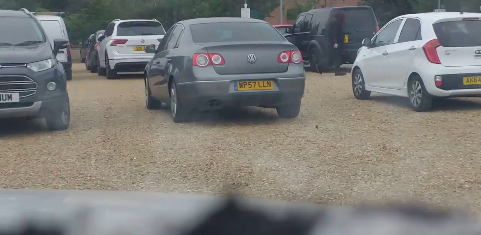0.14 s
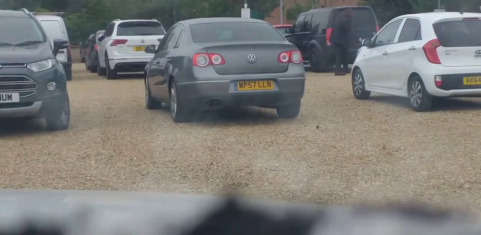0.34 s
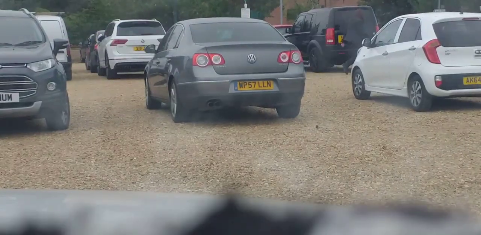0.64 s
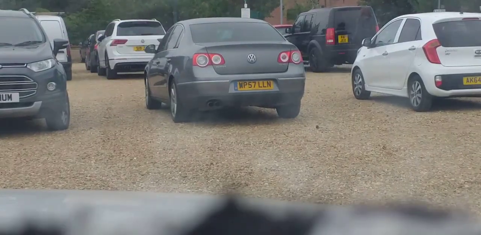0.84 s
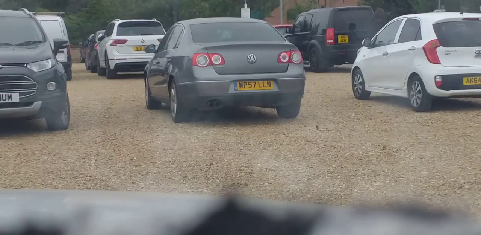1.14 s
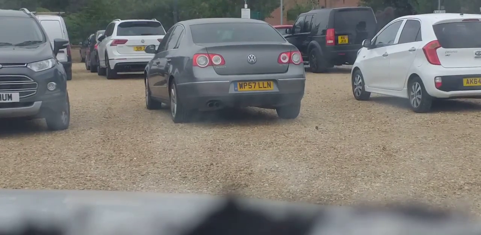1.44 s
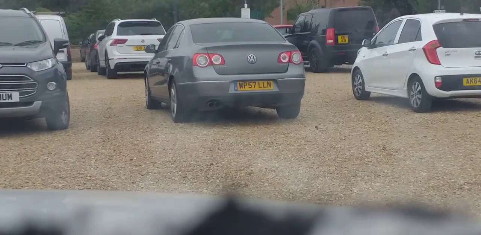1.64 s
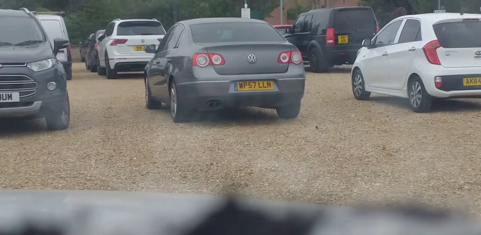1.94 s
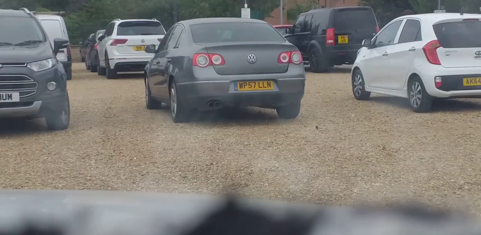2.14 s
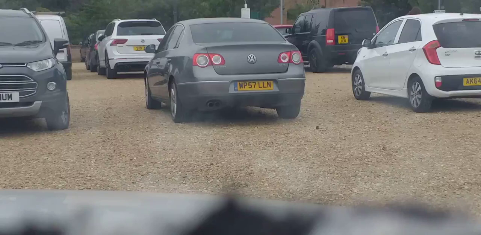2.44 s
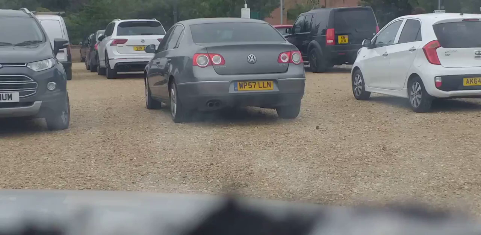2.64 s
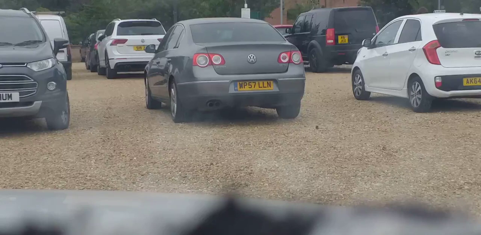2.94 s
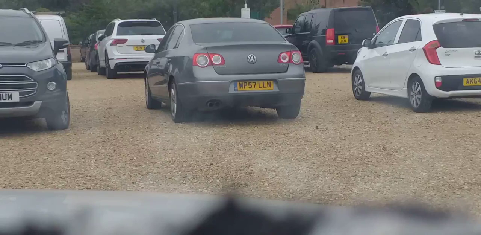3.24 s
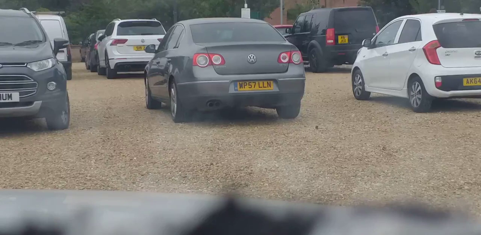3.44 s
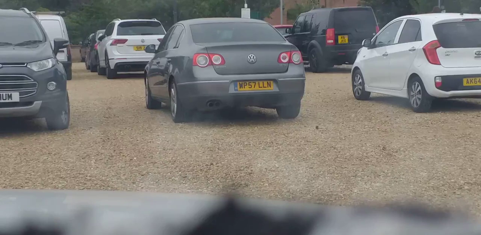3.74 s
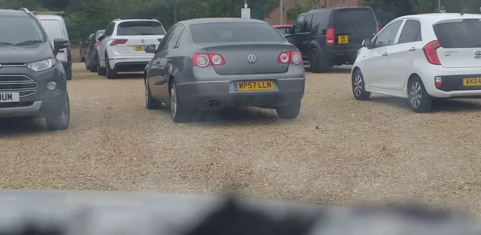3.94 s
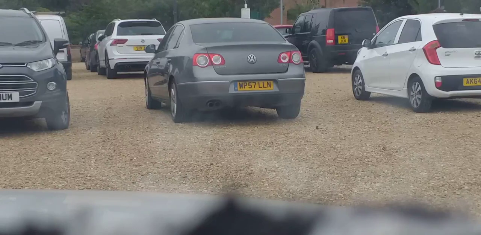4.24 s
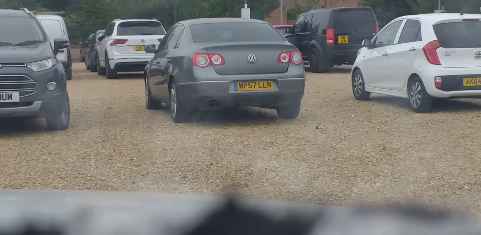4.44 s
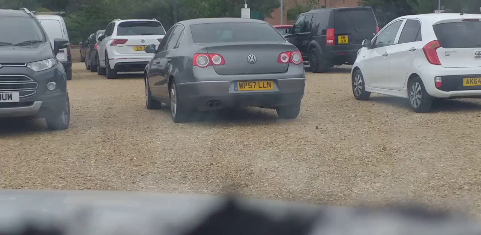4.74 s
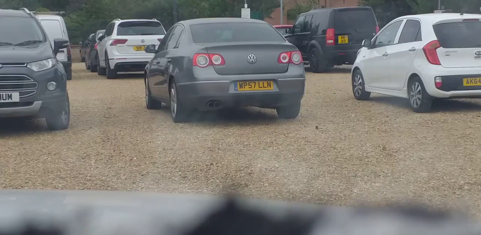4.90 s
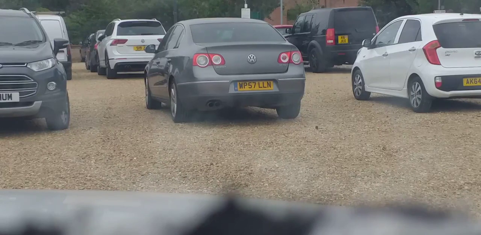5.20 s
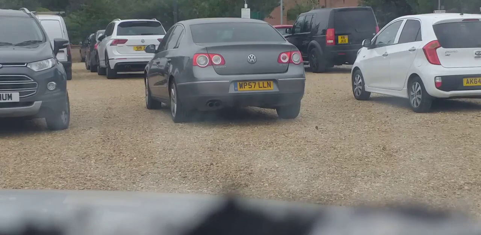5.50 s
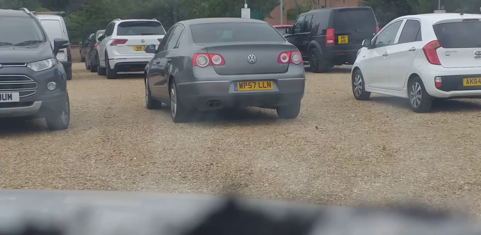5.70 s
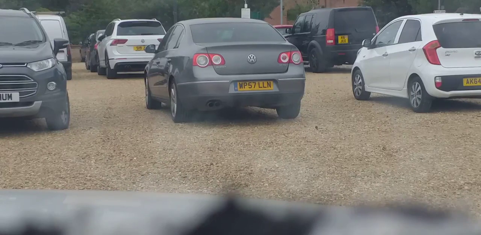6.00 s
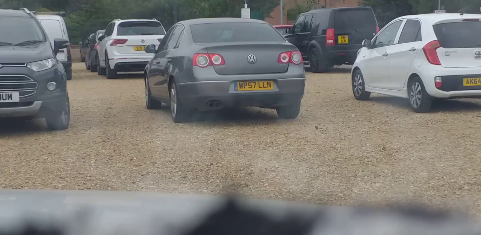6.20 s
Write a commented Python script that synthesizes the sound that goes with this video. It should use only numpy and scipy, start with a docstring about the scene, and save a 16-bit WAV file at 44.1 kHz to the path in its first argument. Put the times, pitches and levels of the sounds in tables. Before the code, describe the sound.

The sound is close, inside the small cabin of a parked car. A hollow knock at about 0.3 seconds starts a series of soft cloth rustles as someone slides over the seat, the cushion rumbling underneath. Dull bumps and sharp little clicks come around 0.8 and 1.3 seconds, with tiny upholstery squeaks near 0.4, 1 and 3 seconds. The trim is scuffed at 2 seconds, and a seat belt hisses faintly from 2.3 to 2.7. More bumps and clicks follow at 2.7 and 3.1 seconds. At 3.8 seconds the door slams, much louder than everything else: a sharp latch crack, a low boom and a shudder that fades within about half a second. Short scuffs and hollow knocks follow near 4.4, 5 and 5.8 seconds, the last the strongest. A faint outdoor rumble lies beneath, swelling slightly around 6 seconds.

```python
"""Cloth rustles inside a parked car as someone slides over the seat, bumping, clicking and scuffing
against the trim. The cushion rumbles, upholstery squeaks and a belt hisses back through its guide.
The door slams: the latch cracks, the panel booms and the body shudders.
In the quiet, closed cabin a few short scuffs follow over a faint outdoor rumble."""
import sys
import numpy as np
from scipy import signal
from scipy.fft import rfft, irfft
from scipy.io import wavfile

SR = 44100
rng = np.random.default_rng(int(sys.argv[2]) if len(sys.argv) > 2 else 0)


def materialize(psi):
    """Save the field psi as 16-bit PCM at rate SR to the path in sys.argv[1].

    A 1-D psi becomes a single channel; in a 2-D psi each row is a channel.
    """
    bounded = np.clip(np.atleast_2d(psi).T, -1, 1)
    quanta = np.round(bounded * 32767).astype(np.int16)
    wavfile.write(sys.argv[1], SR, quanta)


N = 280476
TIME_S = np.arange(N) / SR


def amp(db):
    """Decibels to gain."""
    return 10 ** (np.asarray(db) / 20)


def unit(x):
    """Scales to rms 1."""
    return x / np.sqrt(np.mean(x ** 2) + 1e-20)


def lookup(points, hz):
    """Interpolates a table on a log-frequency axis."""
    points_hz, values = np.transpose(points)
    return np.interp(np.log(hz + 1), np.log(points_hz + 1), values)


def add(mix, start_s, sound):
    """Mixes a sound in at start_s."""
    part = mix[max(round(start_s * SR), 0):][:len(sound)]
    part += sound[:len(part)]


def tint(x, colour):
    """Filters x to rms 1. Each colour row: frequency in Hz, gain in dB."""
    hz = np.fft.rfftfreq(len(x), 1 / SR)
    return unit(irfft(rfft(x) * amp(lookup(colour, hz)), len(x)))


def noise(size, colour):
    """Coloured noise, rms 1."""
    return tint(rng.standard_normal(size), colour)


def wander(rate_hz):
    """Smooth random drift, rms 1."""
    hz = np.fft.rfftfreq(N, 1 / SR)
    return unit(irfft(rfft(rng.standard_normal(N)) * np.exp(-(hz / rate_hz) ** 2), N))


def slips(size, per_s, spread_db):
    """Tiny friction impulses of uneven strength at random moments."""
    impulses = rng.standard_normal(size) * (rng.random(size) < per_s / SR)
    return impulses * amp(spread_db * np.minimum(rng.exponential(1, size), 3))


def swell(t, rise_s, t60_s):
    """Linear rise, exponential decay."""
    return np.minimum(t / rise_s, 1) * amp(-60 * np.maximum(t - rise_s, 0) / t60_s)


def held_db(start_s, end_s, rise_db_per_s, fall_db_per_s):
    """Attack, hold at 0 dB, release."""
    return -rise_db_per_s * np.maximum(start_s - TIME_S, 0) - fall_db_per_s * np.maximum(TIME_S - end_s, 0)


def shaped(x, envelope):
    """Envelopes x, scaled to the energy of the envelope."""
    return unit(x * envelope) * np.sqrt(np.mean(envelope ** 2))


def ring(modes, rise_s, detune=0.):
    """Decaying modes, struck once."""
    t = TIME_S[:SR * 3 // 4]
    out = np.zeros(len(t))
    for hz, db, t60_s in modes:
        tuned_hz = hz * (1 + detune * rng.standard_normal())
        out += amp(db) * swell(t, rise_s, t60_s) * np.sin(2 * np.pi * tuned_hz * t)
    return out


def reflections(ripple_db):
    """Colour of nearby glass and trim: narrow peaks and dips."""
    hz = np.arange(300, SR / 2, 60)
    return np.column_stack([hz, ripple_db * rng.standard_normal(len(hz))])


# Band crossovers. Each row: start in Hz, end in Hz.
CROSSOVERS_HZ = [(500, 800), (2800, 3800), (8000, 9500)]


def bands(x):
    """Splits x into thud, rub, hiss and fizz, each at rms 1."""
    hz = np.fft.rfftfreq(len(x), 1 / SR)
    above = [1] + [np.interp(hz, edge, [0, 1]) for edge in CROSSOVERS_HZ] + [0]
    spectrum = rfft(x)
    return [unit(irfft(spectrum * (low - high), len(x))) for low, high in zip(above, above[1:])]


# Outdoor rumble through the shell. Each row: frequency in Hz, gain in dB.
RUMBLE_COLOUR = [(15, -61.5), (25, -31.5), (46, -14.5), (69, -5.5), (84, -9.5), (99, -15), (183, -19.5),
                 (215, -19.5), (331, -33.5), (1240, -46), (2770, -46.5), (3090, -54), (3530, -41.5),
                 (5730, -50), (15500, -49)]


def outdoors(rumble_db=-60.5, drone_hz=69, drone_db=-57, peak_s=6.15, slope_db_per_s=30):
    """Distant rumble, mostly bass inside the car; a low drone swells and ebbs."""
    pitch_hz = drone_hz + .68 * wander(rate_hz=3.6)
    drone = np.sqrt(2) * np.sin(2 * np.pi * np.cumsum(pitch_hz) / SR)
    envelope = amp(drone_db - slope_db_per_s * abs(TIME_S - peak_s))
    return amp(rumble_db) * noise(N, RUMBLE_COLOUR) + drone * envelope


# Webbing spectrum. Each row: frequency in Hz, gain in dB.
BELT_COLOUR = [(3500, -24), (4280, -4), (4550, -2), (4880, -9), (6200, -5), (8500, -35), (9700, -23.5),
               (10800, -23), (13000, -15.5), (15500, -12)]
# Belt runs. Each row: start in seconds, end in seconds, level in dB.
BELT_RUNS = [(2.28, 2.68, -56.5), (3.44, 3.52, -67.5)]


def belt(ramp_db_per_s=80):
    """Webbing gathers and loses speed, hissing through its guide with a thin whistle."""
    envelope = sum(amp(db + held_db(start_s, end_s, ramp_db_per_s, ramp_db_per_s))
                   for start_s, end_s, db in BELT_RUNS)
    return noise(N, BELT_COLOUR) * envelope * amp(wander(rate_hz=30))


# Pushes across the seat. Each row: start and end in seconds, cloth hiss in dB, seat rumble in dB.
PUSHES = [(.36, 0.567, -48, -56), (0.878, 1.224, -50.5, -49), (1.287, 1.637, -56.5, -50.5),
          (2.12, 2.55, -57.5, -55), (2.74, 3.152, -64.5, -51)]


def movement(brush_db=-64, creep_db=-53, rest_s=3.43):
    """Hiss and rumble levels in dB: pushes over a light contact that fades as the person settles."""
    settling_db = held_db(0, rest_s, rise_db_per_s=0, fall_db_per_s=17)
    hiss, rumble = amp(brush_db + settling_db), amp(creep_db + settling_db)
    for start_s, end_s, hiss_db, rumble_db in PUSHES:
        push_db = held_db(start_s, end_s, rise_db_per_s=64, fall_db_per_s=73.5)
        hiss = np.hypot(hiss, amp(hiss_db + push_db))
        rumble = np.hypot(rumble, amp(rumble_db + push_db))
    return 20 * np.log10(hiss), 20 * np.log10(rumble)


# Seat spectrum. Each row: frequency in Hz, gain in dB.
SEAT_COLOUR = [(18, -46), (30, -18.5), (43, -10), (103, 3), (119, 0.5), (152, -6.5), (200, -5), (356, -7),
               (397, -10.5), (552, -17.5), (800, -20.5), (1040, -56.5), (1760, -120)]


def seat(level_db):
    """Cushion and frame rumble under the shifting weight."""
    return noise(N, SEAT_COLOUR) * amp(level_db + 1.2 * wander(rate_hz=36))


def folds(x, depth_db):
    """Narrow resonances come and go as the folds of cloth move."""
    frames = signal.stft(x, SR, nperseg=1024)[2]
    kernel = np.outer(np.hanning(9), np.hanning(25))
    patches = signal.fftconvolve(rng.standard_normal(frames.shape), kernel, "same")
    return signal.istft(frames * amp(depth_db * unit(patches)), SR, nperseg=1024)[1][:len(x)]


# Rustle spectrum. Each row: frequency in Hz, gain in dB.
CLOTH_COLOUR = [(240, -30), (400, 1), (586, -3), (847, -2), (1120, -4), (1380, -3.5), (1490, -5),
                (2550, -6.5), (3740, -8.5), (6480, -3.5), (8800, -26), (11200, -16.5), (15500, -16)]


def cloth(hiss_db, firm_db=-50):
    """Fibres slip by the thousand under fluttering pressure; a firmer push sounds brighter."""
    fibres = tint(slips(N, per_s=16000, spread_db=-.5), reflections(ripple_db=1.5))
    _, rub, hiss, fizz = bands(tint(folds(fibres, depth_db=2), CLOTH_COLOUR))
    effort_db = hiss_db - firm_db
    rustle = rub * amp(-3.5 + .76 * effort_db) + hiss * amp(effort_db) + fizz * amp(-9.5 + 1.1 * effort_db)
    return rustle * amp(firm_db + 1.1 * wander(rate_hz=35))


# Rubbing squeaks. Each row: start and length in seconds, start and end pitch in Hz, level in dB.
SQUEAKS = [(.375, 0.044, 705, 820, -45.5), (0.976, 0.097, 664, 623, -52), (2.88, 0.11, 888, 850, -57),
           (3.036, 0.041, 766, 750, -43)]


def squeaks(jitter=.06):
    """Upholstery sticks and slips in brief, unsteady glides."""
    out = np.zeros(N)
    for start_s, length_s, start_hz, end_hz, db in SQUEAKS:
        size = int(length_s * SR)
        hz = np.linspace(start_hz, end_hz, size) * (1 + jitter * wander(rate_hz=200)[:size])
        add(out, start_s, amp(db) * np.hanning(size) * np.sin(2 * np.pi * np.cumsum(hz) / SR))
    return out


# Hollow knocks. Each row: start and T60 in seconds, centre and width in Hz, level in dB.
KNOCKS = [(.2835, .035, 850, 140, -39), (.285, 0.13, 330, 70, -41), (.757, .1, 760, 250, -47),
          (2.699, .06, 900, 260, -39), (4.132, 0.051, 1190, 900, -52), (4.938, .28, 1300, 450, -55.5),
          (4.969, .07, 1200, 250, -45), (5.416, .14, 1630, 650, -53), (5.608, .24, 410, 190, -51),
          (5.807, .07, 480, 150, -34.5)]


def knocks(rise_s=.0046):
    """Each brief, rough contact sounds one damped cavity."""
    out, t = np.zeros(N), TIME_S[:SR // 4]
    hz = np.fft.rfftfreq(len(t), 1 / SR)
    for start_s, t60_s, centre_hz, width_hz, db in KNOCKS:
        cavity_db = -30 * np.log10(1 + ((hz - centre_hz) / width_hz) ** 2)
        knock = noise(len(t), np.column_stack([hz, cavity_db]))
        add(out, start_s, amp(db) * shaped(knock, swell(t, rise_s, t60_s)))
    return out


# Click spectrum. Each row: frequency in Hz, gain in dB.
CLICK_COLOUR = [(500, -29), (2000, -9), (4400, -5), (5600, 4), (6500, 5), (7700, -15), (9000, -32),
                (13000, -20.5), (16000, -22)]
# Hard contacts. Each row: start in seconds, level in dB, T60 in seconds.
CLICKS = [(.8, -46.5, 0.084), (0.835, -43.5, 0.1), (1.289, -34.5, 0.028), (1.3, -30, 0.063),
          (1.982, -47, 0.064), (2.105, -33, 0.02), (2.334, -36.5, 0.011), (2.715, -34, 0.011),
          (3.166, -30.5, 0.055), (4.008, -58, 0.21)]


def clicks(rise_s=.0014):
    """Buckle and trim tick, smeared by the close cabin walls."""
    out, t = np.zeros(N), TIME_S[:SR // 5]
    for start_s, db, t60_s in CLICKS:
        reflected = tint(rng.standard_normal(len(t)), reflections(ripple_db=.5))
        add(out, start_s, amp(db) * shaped(tint(reflected, CLICK_COLOUR), swell(t, rise_s, t60_s)))
    return out


# Scrape spectrum. Each row: frequency in Hz, gain in dB.
SCUFF_COLOUR = [(120, -43), (220, -13), (360, 2.5), (540, -3), (830, -4.5), (1150, -3), (2050, -9.5),
                (2350, -12.5), (3700, -13), (4500, -15), (6000, -11), (7400, -15.5), (8600, -35.5),
                (12400, -25), (15500, -34.5)]
# Hollow trim resonances. Each row: centre in Hz, width in Hz, lift in dB.
TRIM_RESONANCES = [(372, 22, 10), (440, 48, -1), (690, 71, 7.5), (1060, 44, 8), (1210, 51, 1.5),
                   (1400, 70, 4.5), (1880, 72, 6), (2100, 85, 5.5), (2610, 100, 3), (3550, 100, 2.5),
                   (6140, 120, 2.5)]
# Scrapes. Each row: peak time, 20 dB rise time and T60 in seconds, rub level in dB,
# hiss and fizz in dB relative to the rub.
SCUFFS = [(.284, 0.0015, 0.16, -46, -8, -28), (1.083, .025, 0.26, -47.5, 2, -12),
          (1.592, .03, .22, -61, 16, 11.5), (2.011, .003, 0.25, -46, -2, -11.5),
          (2.066, .02, 0.34, -46, -1, -12), (2.6998, .0008, 0.11, -39, -10, -30),
          (3.168, .002, 0.093, -39.5, -.5, -13), (3.729, .018, .18, -45, -16, -42),
          (3.758, .003, 0.22, -45.5, -6.5, -28), (4.098, .09, .09, -48, -21, -37),
          (4.356, .005, .26, -49.5, -3, -18.5), (4.389, .025, .115, -43.5, -3.5, -12.5),
          (4.973, .018, .11, -44.5, -8, -13), (5.033, .006, 0.16, -46, -12.5, -27),
          (5.049, .008, .15, -54, -6, -11.5), (5.722, .08, .26, -58.5, -15, -24),
          (5.817, .022, .1, -35, -9, -21), (5.88, .03, .2, -59, -1, -9.5)]


def scuffs(drag_db=-23, drag_t60_s=.3, thud_extra_s=.03):
    """Gritty scrapes sound the hollow trim and trail into a faint drag; the cabin holds the lows longest."""
    out, t = np.zeros(N), TIME_S[:SR // 2] - TIME_S[SR // 8]  # zero at the peak
    after_s = np.maximum(t, 0)
    tail_db = drag_db - 60 * after_s / drag_t60_s
    hz = np.fft.rfftfreq(len(t), 1 / SR)
    trim_db = sum(lift_db / (1 + (2 * (hz - centre_hz) / width_hz) ** 2)
                  for centre_hz, width_hz, lift_db in TRIM_RESONANCES)
    walls_db = lookup(reflections(ripple_db=1.7), hz)
    colour = np.column_stack([hz, lookup(SCUFF_COLOUR, hz) + trim_db + walls_db])
    for peak_s, rise_s, t60_s, db, hiss_db, fizz_db in SCUFFS:
        thud, rub, hiss, fizz = bands(tint(slips(len(t), per_s=7000, spread_db=2.8), colour))
        build_up = amp(20 * np.minimum(t, 0) / rise_s)
        stroke = build_up * amp(np.maximum(-60 * after_s / t60_s, tail_db))
        low_stroke = build_up * amp(np.maximum(-60 * after_s / (t60_s + thud_extra_s), tail_db))
        treble = amp(hiss_db) * shaped(hiss, stroke) + amp(fizz_db) * shaped(fizz, stroke)
        low = amp(-6 - .2 * hiss_db) * shaped(thud, low_stroke)  # more hiss, less thud
        add(out, peak_s + t[0], amp(db) * (low + shaped(rub, stroke) + treble))
    return out


# Cabin modes. Each row: frequency in Hz, gain in dB, T60 in seconds.
CABIN_MODES = [(52.5, -17, .25), (82.4, -13.5, .18), (108, -3.5, 0.24), (150, -2, 0.12), (191, -5.5, 0.22),
               (254, -6, .16), (316.5, -3, 0.23), (349, 0.5, 0.19), (442.2, -14, .09), (684, -1, .1)]
# Soft bumps on seat and floor. Each row: start in seconds, level in dB, cutoff in Hz.
THUMPS = [(.284, -38.5, 280), (.759, -27, 290), (1.103, -38, 180), (1.312, -29.5, 190), (1.523, -43, 150),
          (2.713, -42, 170), (3.085, -36.5, 202), (3.129, -31.5, 180), (3.707, -39, 180), (3.728, -31, 405),
          (3.996, -39, 196), (4.042, -43, 300), (4.091, -41, 250), (4.975, -47, 450), (5.113, -56, 350)]


def thumps(rebound_s=.023, rebound_db=-7.5, rise_cycles=.6):
    """Each bump and its weaker rebound ring the cabin; a softer push reaches fewer modes."""
    out = np.zeros(N)
    for start_s, db, cutoff_hz in THUMPS:
        for hit_s, hit_db in [(start_s, db), (start_s + rebound_s, db + rebound_db)]:
            for hz, mode_db, t60_s in CABIN_MODES:
                level_db = hit_db + mode_db - 10 * np.log10(1 + (hz / cutoff_hz) ** 4)
                add(out, hit_s, ring([(hz, level_db, t60_s)], rise_s=rise_cycles / hz, detune=.03))
    return out


# Crack spectrum. Each row: frequency in Hz, gain in dB.
CRACK_COLOUR = [(200, -14), (360, -4), (480, -11.5), (780, -14), (1050, -0.5), (1300, -14), (1700, -5),
                (2100, -2.5), (2350, -12.5), (2750, -4.5), (3300, -11), (5000, -11.5), (6500, -7.5),
                (8700, -31), (14000, -30), (16000, -43)]
# Crack decay. Each row: frequency in Hz, T60 in seconds.
CRACK_DECAY = [(300, 0.42), (900, 0.14), (2000, 0.07), (6000, .075), (12000, .06)]


def latch_crack(t, rise_s=.003):
    """Bolt hits striker: a noise burst whose treble dies first, rms 1 over the first 8 ms."""
    hz, frame_s, frames = signal.stft(noise(len(t), CRACK_COLOUR), SR, nperseg=256)
    decay = amp(-60 * frame_s / lookup(CRACK_DECAY, hz)[:, None])
    crack = signal.istft(frames * decay, SR, nperseg=256)[1][:len(t)]
    crack *= np.minimum(t / rise_s, 1)
    return crack / np.std(crack[:SR // 125])


# Latch and door skin modes. Each row: frequency in Hz, level in dB, T60 in seconds.
LATCH_MODES = [(960, -18.5, .075), (1108, -20.5, 0.075), (1140, -29.5, .06), (1745, -24, .05),
               (1790, -21.5, 0.042), (2088, -13, 0.034), (2570, -35, .09), (2805, -26, 0.046),
               (3655, -29.5, 0.089), (5335, -28.5, 0.034), (6030, -33, 0.05)]
# Door panel and cabin air modes. Each row: frequency in Hz, level in dB, T60 in seconds.
BOOM_MODES = [(58, -38, .6), (117, -34.5, .5), (120, -34.5, 0.13), (201.6, -29, .5), (258.5, -31.5, 0.35),
              (347.2, -22.5, 0.14), (373, -25.5, 0.17)]
# Body shudder spectrum. Each row: frequency in Hz, gain in dB.
SHUDDER_COLOUR = [(30, -31.5), (55, -4.5), (110, -1), (250, 1), (380, -9), (480, -25), (700, -21.5),
                  (1200, -39), (4000, -42.5), (9000, -63.5)]


def door_slam(strike_s=3.7938, crack_db=-18, shudder_db=-37):
    """The latch cracks and rings, the panel booms and the car body shudders on its springs."""
    out, t = np.zeros(N), TIME_S[:SR * 3 // 4]
    crack = latch_crack(t)
    add(out, strike_s - .0035, amp(crack_db - 18) * crack)  # the bolt grazes before it bites
    add(out, strike_s, amp(crack_db) * crack)
    add(out, strike_s + .001, ring(LATCH_MODES, rise_s=.0023, detune=.0015))
    add(out, strike_s + .0014, ring(BOOM_MODES, rise_s=.0024))
    shudder = shaped(noise(len(t), SHUDDER_COLOUR), swell(t, rise_s=.019, t60_s=.98))
    add(out, strike_s, amp(shudder_db) * shudder)
    return out


def scene():
    """Centred mix; only the top treble differs slightly between channels."""
    hiss_db, rumble_db = movement()
    mid = cloth(hiss_db) + belt() + seat(rumble_db) + outdoors()
    mid += thumps() + clicks() + scuffs() + knocks() + squeaks() + door_slam()
    treble = signal.sosfilt(signal.butter(6, 5800, "high", fs=SR, output="sos"), mid)
    side = amp(-22) * np.roll(treble, SR // 500)  # 2 ms late
    return np.array([mid + side, mid - side])


def record(dry):
    """Cuts the deepest bass and the top treble."""
    low_hz, high_hz = 42, 15850
    highpass = signal.butter(8, low_hz, "high", fs=SR, output="sos")
    lowpass = signal.firwin(511, high_hz, window=("kaiser", 9), fs=SR)
    return signal.oaconvolve(signal.sosfilt(highpass, dry), lowpass[None], "same")


dry = scene()
out = record(dry)
materialize(out)
```